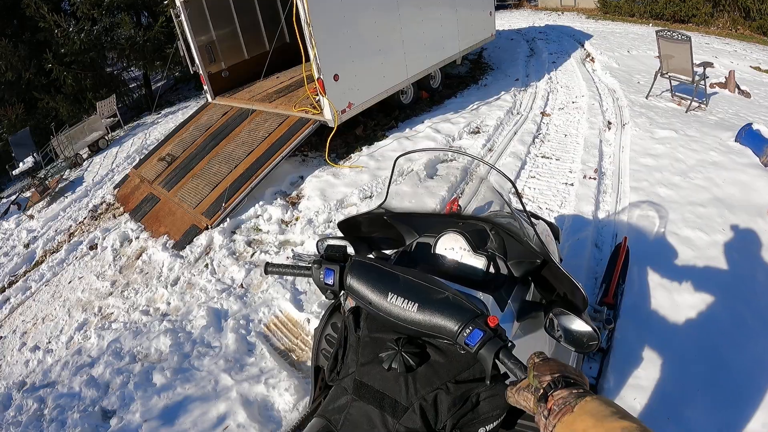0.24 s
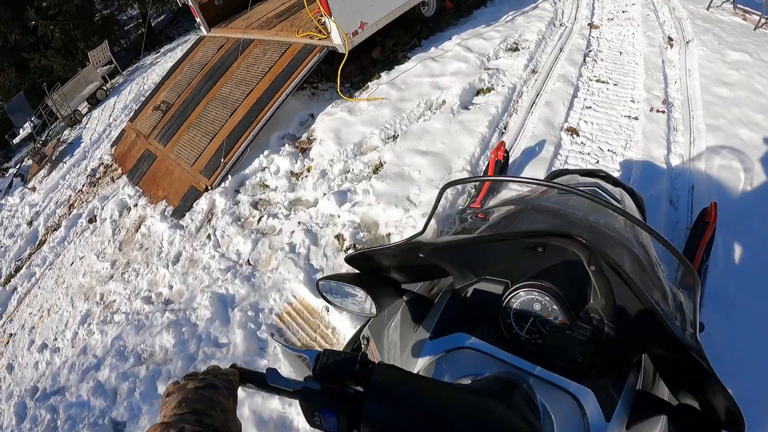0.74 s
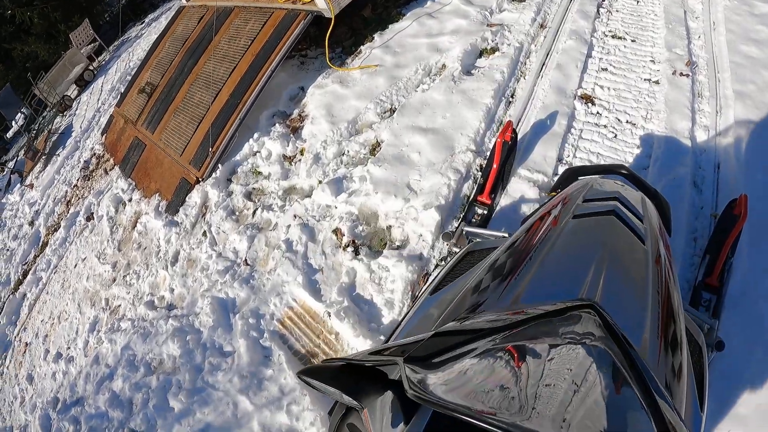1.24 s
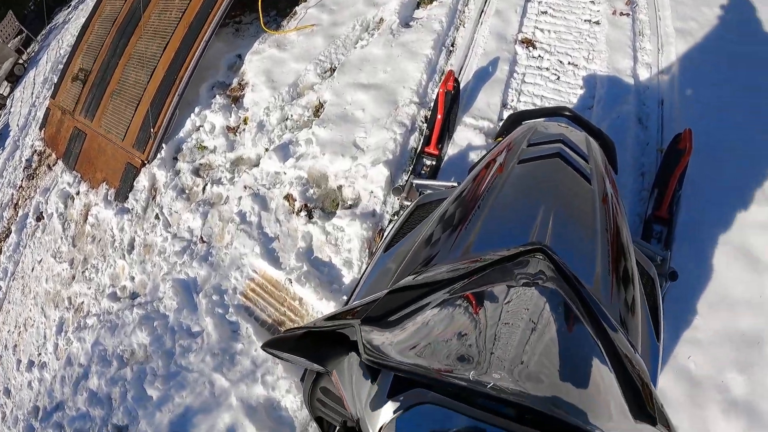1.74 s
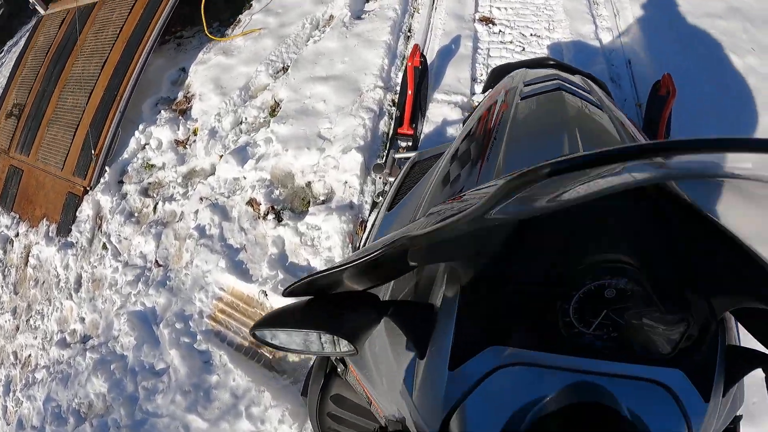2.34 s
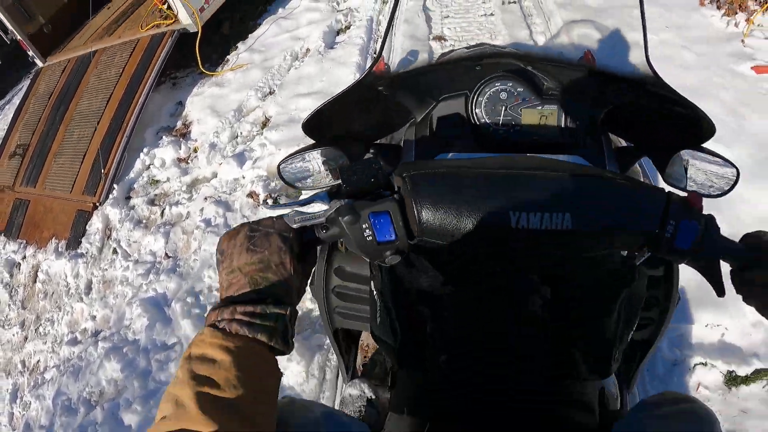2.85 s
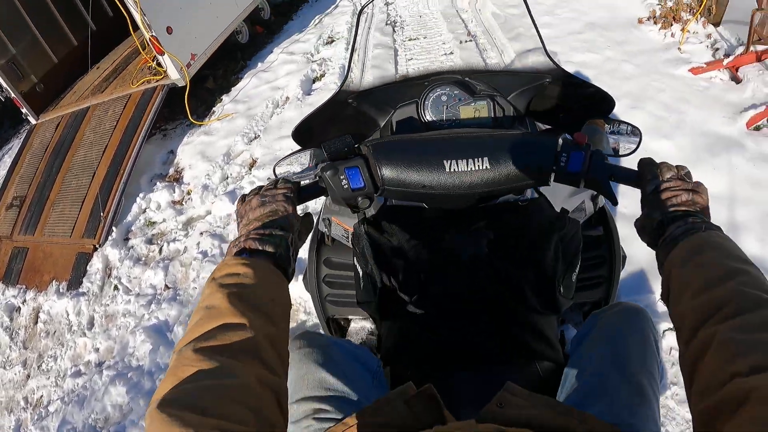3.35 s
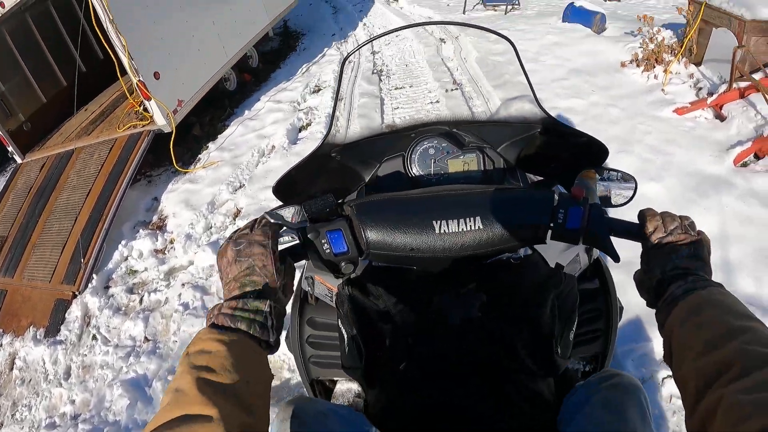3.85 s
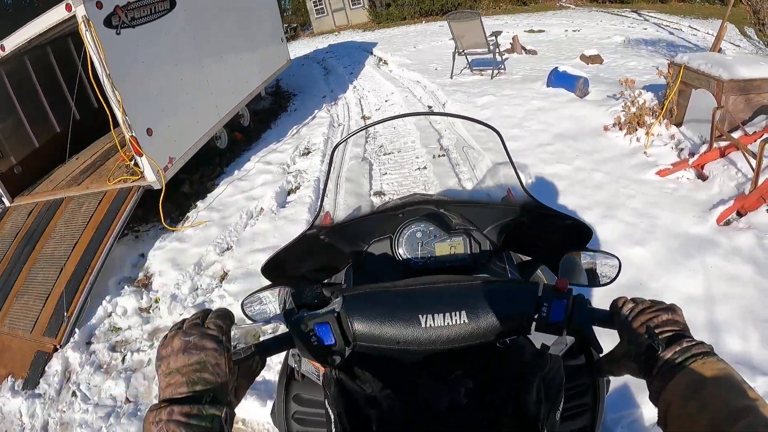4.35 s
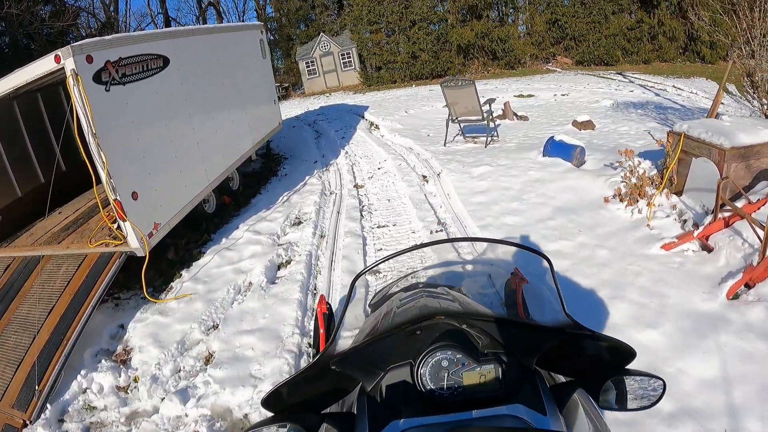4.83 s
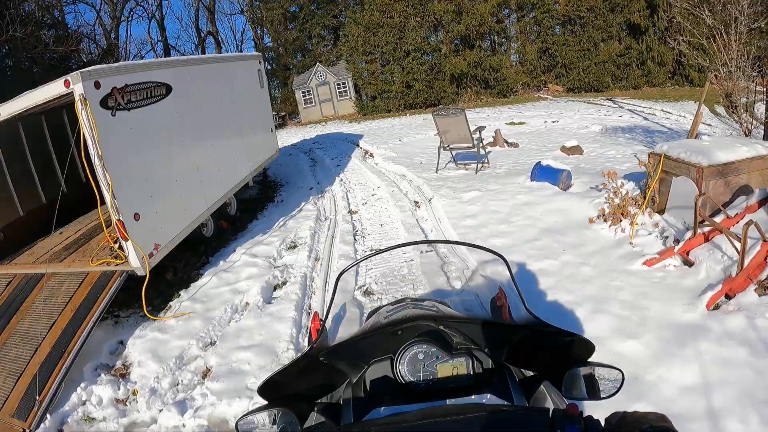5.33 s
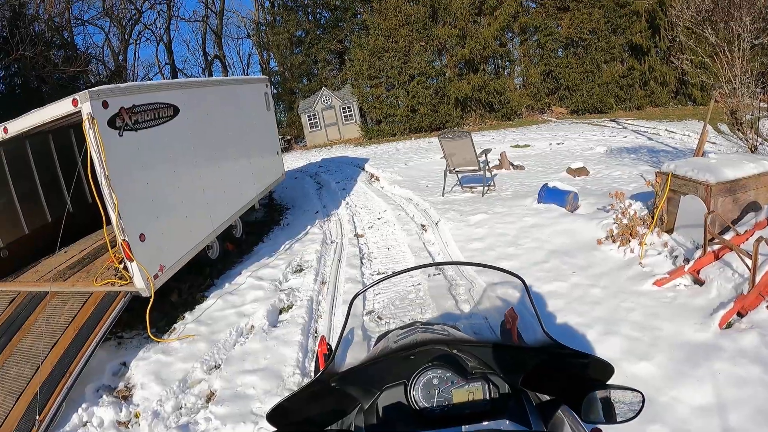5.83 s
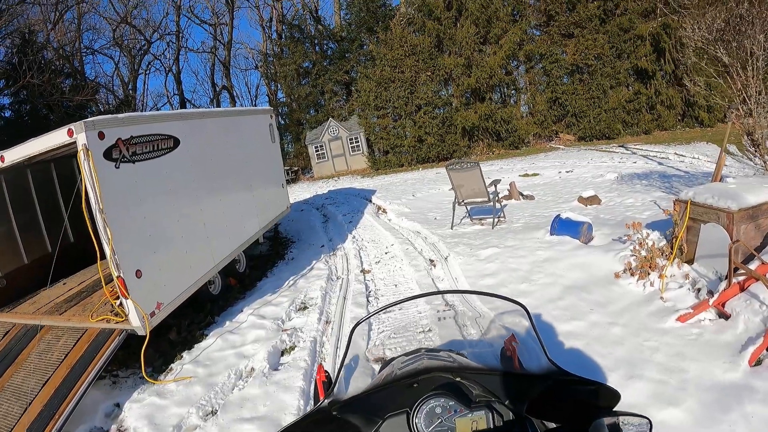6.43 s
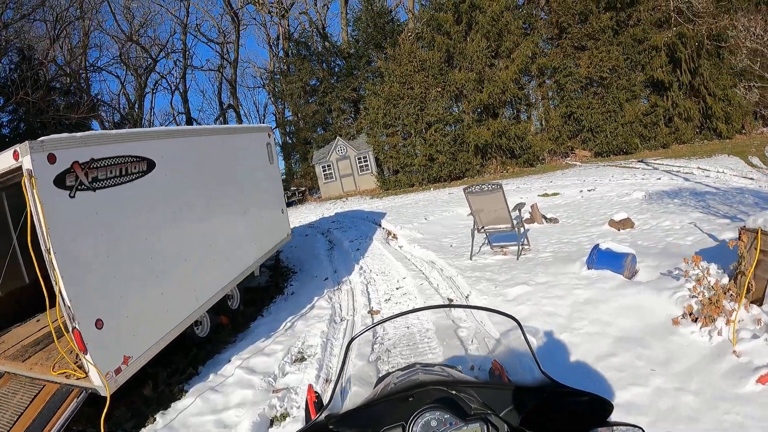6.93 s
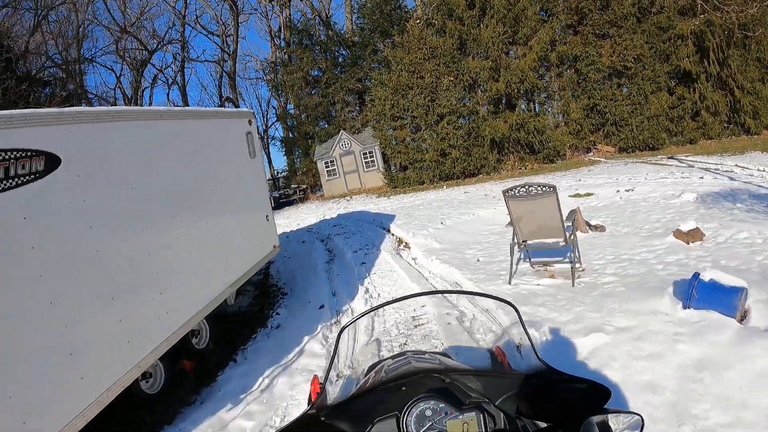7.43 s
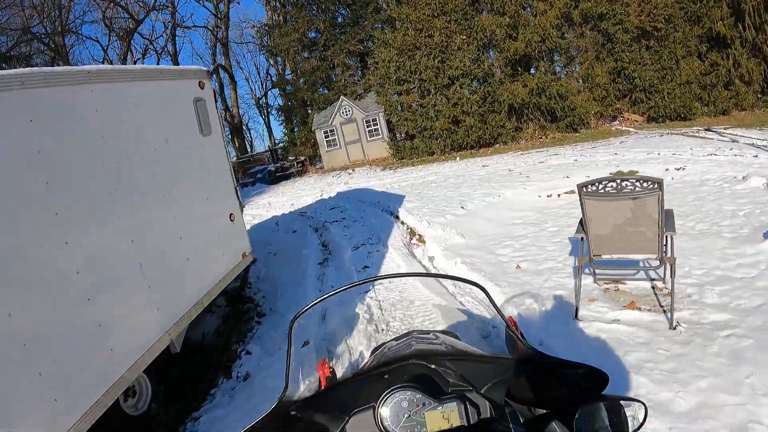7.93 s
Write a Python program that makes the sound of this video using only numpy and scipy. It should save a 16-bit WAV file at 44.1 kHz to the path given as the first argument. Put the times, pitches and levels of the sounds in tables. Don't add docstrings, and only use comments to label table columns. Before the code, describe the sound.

Close rider's-ear view of a snowmobile engine chugging unevenly at idle, brighter when leaned over, then surging into a deep rattling roar.

```python
import sys
import numpy as np
from scipy import signal
from scipy.fft import rfft, irfft
from scipy.io import wavfile
from scipy.ndimage import uniform_filter1d

SR = 44100
rng = np.random.default_rng(int(sys.argv[2]) if len(sys.argv) > 2 else 0)


def master_out(mix):
    frames = np.transpose(np.atleast_2d(mix))
    ceiling = np.clip(frames, -1, 1)
    pcm = np.round(ceiling * 32767).astype(np.int16)
    wavfile.write(sys.argv[1], SR, pcm)


def rack_gain(trim_db):
    fader = np.asarray(trim_db, float)
    return 10 ** (fader / 20)


N = 360738
T = np.arange(N) / SR

# time in seconds, cycle rate in Hz.
SPEED = [(0.0, 17.66), (0.26, 18.43), (1.4, 17.62), (2.02, 18.5), (3.77, 17.81), (4.02, 18.37),
         (4.32, 17.63), (4.93, 18.21), (5.44, 17.8), (5.8, 19.69), (6.09, 33.39), (6.32, 32.01),
         (6.73, 34.17), (7.03, 33.94), (7.48, 31.21), (7.77, 25.56), (8.01, 30.69), (8.18, 31.8)]
# time in seconds, throttle opening from 0 to 1.
THROTTLE = [(0, 0.07), (5.7, 0.11), (5.84, 0.68), (6.03, 0.99), (7.15, 0.98), (7.38, 0.84), (7.7, 0.41),
            (7.84, 0.86), (8.18, 0.9)]
# time in seconds, leaning over the hood 0-1, looking into the footwell 0-1.
RIDER = [(0, 0.1, 1), (.45, 0.05, 0.9), (.75, 0.29, 0), (1.25, 0.96, 0.22), (1.75, 1, 0.8),
         (2.5, 0.93, 0.92), (2.9, 0.44, 0.75), (3.25, 0.22, 0.6), (3.8, 0.3, 0.55), (4.16, 0.27, 0.82),
         (4.5, 0.39, 0.48), (4.85, 0.27, 0.4), (5.75, 0.35, 0.16), (6.4, 0.29, 0.65), (6.9, 0.21, 0.75),
         (7.4, 0.39, 0.24), (7.7, 0.37, 0.2), (8.18, 0.64, 0)]
# multiple of the cycle rate, level in dB.
IDLE_HARMONICS = [(1, -19), (2, 2.5), (3, -6.5), (4, 6.5), (5, -5.5), (6, -8.5), (7, -13.5), (8, -10),
                  (9, -11), (10, -25.5), (11, -28), (12, -11.5), (13, -27), (14, -16), (15, -15), (16, -23),
                  (17, -23), (18, -19.5), (19, -24.5), (20, -24.5), (21, -18.5), (22, -25.5), (23, -45),
                  (24, -45)]
# multiple of the cycle rate, level in dB.
PULLING_HARMONICS = [(1, -3.5), (2, 2), (3, -6.5), (4, -23.5), (5, -14), (6, -7.5), (7, -39), (8, -11.5),
                     (9, -5.5), (10, -24), (11, -20.5), (12, -23), (13, -19), (14, -25), (15, -23),
                     (16, -22), (17, -13.5), (18, -13), (19, -18), (20, -29), (21, -33), (22, -30),
                     (23, -41.5), (24, -39)]
# pitch in Hz, width in Hz, level in dB.
INTAKE = [(282, 75, 19.5), (594, 99, 12), (380, 37, -3.5)]
# time in seconds, how far it stands out in dB.
UNEVEN = [(0, 10), (1.3, 15.5), (2.0, 7.5), (3.0, 9.5), (3.5, 9.5), (4.6, 11.5), (5.7, 3), (6.4, -1),
          (6.7, 8.5), (7.3, 2.5), (7.72, 17.5), (7.86, 7), (8.18, 3)]
# time in seconds, level in dB.
RAGGED = [(0, -4), (5.75, -4), (5.9, -2), (6.08, -6.5), (6.45, -6.5), (6.72, -4), (6.82, 4), (6.95, 3),
          (7.05, 0), (7.3, 3), (7.7, 2), (7.85, 5), (8.18, 2)]
# time in seconds, level in dB, pitch of the ringing pipe in Hz, change of bark in dB
STUMBLES = [(0.138, -35, 90, 0), (0.909, -17.5, 89, -4), (1.354, -22, 89.5, -1), (1.646, -46, 80.5, 0),
            (2.27, -38, 85, -4), (2.695, -25, 85, 0), (3.278, -44, 80.5, 0), (3.34, -29, 79, -6.5),
            (3.667, -23, 85, 0), (4.064, -10.5, 78, 14), (4.621, -25, 92, -5.5), (4.847, -13, 80, -7),
            (5.347, -35, 84, -2), (6.881, -11, 97.4, -6), (6.931, -21, 92, 5), (7.314, -30, 80, 0),
            (7.829, -21, 144, -8), (7.88, -18, 157, -27), (7.956, -13.5, 87, -10.5)]
# share of the cycle, dB in the block, dB at the top, decay in seconds.
KNOCKS = [(.21, -4.5, -9, 0.019), (0.41, -7.5, -4, 0.007), (0.54, -10, -13, 0.014),
          (0.73, -12, -6.5, 0.008)]
# time in seconds, dB relative to the usual first blow of a
EXTRA_KNOCKS = [(0.78, -6.5), (1.3404, -4), (1.507, -6.5), (1.619, -4.5), (1.678, -8), (1.732, -2),
                (2.274, -1), (2.495, -1.5), (2.549, -7), (2.605, -2), (3.213, -1), (3.375, -12),
                (3.5455, -2), (5.3847, -5), (5.7056, -4), (3.716, 0.5), (4.716, -2), (4.936, 0.5),
                (4.994, -1), (5.877, 0), (0.4, -16), (0.8355, -13.5), (0.9477, -4.5), (1.058, -10),
                (1.2261, -4), (1.285, -4.5), (1.9505, -14), (2.0588, -14.5), (2.171, -3.5), (2.2207, -6.5),
                (2.3306, -4.5), (2.386, -5), (2.715, -8), (2.8206, -8), (3.3203, -7), (3.773, -3.5),
                (3.8254, -14.5), (4.214, -12), (4.3854, -10), (4.7698, -5.5), (5.1058, -10.5), (7.51, -6),
                (7.8, -4.5), (7.832, -11.5), (7.87, 3)]
# frequency in Hz, level in dB.
IDLE_BODY = [(120, -6.5), (200, 11), (222, 0), (242, -10), (263, 7), (296, -4), (329, -4), (350, -2.5),
             (385, -9), (633, -14), (1030, -22.5), (1880, -18.5), (2500, -29.5), (3250, -47), (5500, -120)]
# frequency in Hz, level in dB.
PULLING_BODY = [(71, -30.5), (120, 0.5), (130, 6), (161, 3.5), (199, 0.5), (232, 2), (251, -3.5),
                (296, 2.5), (391, -16.5), (587, -14.5), (767, -19.5), (1000, -19.5), (1310, -42),
                (1500, -23.5), (2500, -34), (3250, -52), (5500, -120)]
# pitch in Hz, level in dB, time to fall 60 dB in seconds.
BLOCK = [(1010, 7, 0.03), (1183, 11, 0.021), (1413, 11, 0.015), (1537, 2.5, 0.032), (1695, -1.5, 0.041),
         (1955, -9, 0.041), (2800, -8, 0.029), (3140, -10.5, 0.024)]
# frequency in Hz, level in dB.
HOOD = [(1900, 4), (2400, -8), (2800, -0.5), (3400, -8), (3900, -10.5), (5200, -7.5), (5800, -15.5),
        (6200, -11.5), (7900, -15), (8400, -23), (9300, -28.5), (11700, -26), (13400, -43.5), (15600, -61)]
# time in seconds, level in dB.
SCREEN = [(0, -4), (.8, -19.5), (2.2, -3.5), (3, 2.5), (6.8, 0), (7.8, 6.5)]
# time of the peak in seconds, level in dB, fade in seconds.
WHISTLES = [(5.79, -65, .05), (5.875, -53, .05), (5.945, -58, .04), (5.99, -63.5, .7), (6.1, -62, .03),
            (7.92, -64, .06), (8.15, -62, .1)]
# time in seconds, level in dB.
TICKS = [(4.0125, -32), (4.0166, -16), (4.0179, -3), (4.0192, -21), (4.022, -29), (4.034, -46)]
# pitch in Hz, level in dB, time to fall 60 dB in seconds.
CASE = [(3670, 2, 0.0027), (4720, 13.5, 0.00071), (5330, 5.5, 0.00066), (6050, -9, 0.0012),
        (7600, -8.5, 0.0019), (8700, -11.5, 0.0021), (13000, -21, 0.0032)]
# time in seconds, half length in seconds, level in dB.
RUBS = [
    (4.47, 0.068, -42),
    (2.8, .04, -58),
]
# frequency in Hz, side level over the middle in dB.
WIDTH = [(60, -38), (140, -61), (300, -16.5), (600, -14), (1100, -12), (2000, -5), (5000, -6.5),
         (8000, -5.5), (10500, -10), (12400, -1)]

# dB at rest, dB gained leaning over, dB gained at full throttle
BOOM, BARK = (-16.5, -1.4, 0.93), (-29.5, 3.6, 9.04)
BLOCK_NOISE, HOOD_NOISE, COWL = (-38, 8, 6.8), (-66.5, 12.55, 8.6), (-6, 17.9, .3)


def exhaust(cycle, hz, load, throttle, bark_db, third_db, rough, cowl_db, well_db, lean):
    boom, bark = np.zeros(N), np.zeros(N)
    for (k, idle_db), (_, pulling_db) in zip(IDLE_HARMONICS, PULLING_HARMONICS):
        pitch = k * hz
        late = harmonic_delay(k, pitch, load, lean)
        unsteady = rough * (1.1 + .05 * k + (k < 6) * 2.0 * (1 - load))
        wobble = unsteady * (per_cycle(cycle) + 1j * per_cycle(cycle))
        open_db = pulling_db + intake_db(pitch) - intake_db(k * 32.7)
        opening = throttle if k > 5 else load
        db = idle_db + opening * (open_db - idle_db) + (k == 3) * third_db
        db += cowl_db * hump(pitch, 176.3, 22) + well_db * hump(pitch, 417, 50)
        tone = rack_gain(db) * ((1 + wobble) * np.exp(1j * (2 * np.pi * k * cycle + late))).real
        low = np.clip((150 - pitch) / 40, 0, 1)
        boom += low * tone
        bark += (1 - low) * tone
    return even_out(boom, boom, SR // 4) + rack_gain(bark_db - 1.5) * even_out(bark, bark, SR // 4)


def harmonic_delay(k, pitch, load, lean):
    late = silencer_lag(pitch) + (k > 3) * 1.4 * load + (k == 5) * np.pi * (1 - load)
    late += (k > 12) * load * (2.4 - np.arctan((pitch - 590) / 50) + (pitch - 590) / 110)
    late += load * min(.16 * k, 2.4) + (k == 1) * np.pi * (1 - load)
    over = np.clip((lean - .45) / .4, 0, 1)
    if k < 11:
        turn = 3.2 - 4.1 * over
    elif k == 11:
        turn = 1.4 - 2.3 * over
    elif k < 14:
        turn = 1.4 + 2.1 * over
    else:
        turn = 3.6
    return late + (1 - load) * ((k > 7) * turn + (k == 18) * 1.8 - (k > 18) * 1.2)


def silencer_lag(hz):
    return np.maximum(270 / hz - 4.2, -1.4)


def intake_db(hz):
    return sum(db * hump(hz, centre, width) for centre, width, db in INTAKE)


def stumbles():
    out, drop_db = np.zeros(N), np.zeros(N)
    for s, db, hz, bark_db in STUMBLES:
        t = np.maximum(T - s, 0)
        swell = (t / .016) * np.exp(1 - t / .016)
        out += rack_gain(db - 1.0) * np.sin(2 * np.pi * hz * t) * swell
        drop_db += np.minimum(bark_db, 0) * swell
    return out, drop_db


def clatter(cycle, load, lean, body_db, hood_db, ragged_db):
    swing_db = 2 - 6.5 * load
    puff_db = swing_db * np.cos(2 * np.pi * (cycle - .7 - .3 * load))
    puff = stereo_noise((0.5 + 0.12 * load) * rack_gain(ragged_db + puff_db))
    cycle = cycle - .5 * load
    body = block_body(cycle, load, puff)
    hood = hood_ticks(cycle, load)
    body = shelf(body, 1270, -6.5 * lean, "low")
    hood = shelf(hood, 6600, -9 * lean + follow(SCREEN), "high")
    return rack_gain(body_db) * body + rack_gain(hood_db + 18.5) * hood


def block_body(cycle, load, puff):
    blows = .12 + .55 * load + knocks(cycle, scatter_db=2.2, sharp=1.15)
    shake = stereo_noise(blows, cycle - KNOCKS[0][0] + .03)
    shake = shelf(shake, 967, -40.5, "low") + shelf(puff, 967, -32.5, "high")
    idle = unit(colour(shake, IDLE_BODY))
    pulling = unit(colour(shake, PULLING_BODY))
    body = (1 - load) * idle + load * pulling
    block = unit(sum(rack_gain(db) * ring(shake, hz, t60) for hz, db, t60 in BLOCK))
    body += rack_gain(-11 - 8 * load) * block
    band = signal.sosfilt(signal.butter(4, [800, 2300], "band", fs=SR, output="sos"), body[0])
    body = even_out(body, band, SR // 3)
    return colour(body, [(100, -7), (200, -15), (300, -9), (450, 1), (600, -4), (750, -6.5), (950, -1.5)])


def hood_ticks(cycle, load):
    tick = stereo_noise(0.22 + 0.65 * load + knocks(cycle, scatter_db=5.5, sharp=4.8))
    top = stereo_noise(0.17 + 0.37 * load + knocks(cycle, scatter_db=6.0, sharp=4.5, top=True))
    tick = colour(tick, [(4000, 0), (4800, -3), (6000, -24)])
    top = colour(top, [(3800, -24), (4800, -3), (5700, 0)])
    hood = colour(tick + top, HOOD)
    return even_out(hood, hood[0], SR // 3)


def knocks(cycle, scatter_db, sharp, top=False):
    env = np.zeros(N)
    for order, (share, block_db, top_db, decay) in enumerate(KNOCKS):
        db = top_db if top else block_db
        at = np.flatnonzero(np.diff(np.floor(cycle - share)))
        hit = np.zeros(N)
        hit[at] = rack_gain(db + scatter_db * rng.standard_normal(N // 1000)[:len(at)])
        if order == 0:
            for s, extra_db in EXTRA_KNOCKS:
                hit[int(s * SR)] += rack_gain(db + extra_db)
        env += signal.lfilter([1], [1, -np.exp(-sharp / (decay * SR))], hit)
    rise = np.exp(-1 / (0.002 * SR))
    return signal.lfilter([1 - rise], [1, -rise], env)


def whistle(cycle):
    hz = 6335 - 330 * np.exp(-np.maximum(T - THROTTLE[1][0], 0) / .14)
    flutter = 1 + .4 * unit(uniform_filter1d(rng.standard_normal(N), size=300))
    flutter *= 1 + 0.7 * np.cos(2 * np.pi * cycle)
    env = np.zeros(N)
    for s, db, fade in WHISTLES:
        env += rack_gain(db) * np.exp(np.minimum((T - s) / 0.015, (s - T) / fade))
    squeak_env = rack_gain(-60) * np.exp(np.minimum((T - 5.87) / .01, (5.87 - T) / .07))
    squeak = squeak_env * np.sin(2 * np.pi * 5790 * T)
    return np.sqrt(2) * flutter * (env * np.sin(2 * np.pi * np.cumsum(hz) / SR) + squeak)


def finger():
    hit = np.zeros(N)
    for s, db in TICKS:
        hit[int(s * SR)] = rack_gain(db)
    rasp = signal.lfilter([1], [1, -np.exp(-1 / (.0022 * SR))], hit) * rng.standard_normal(N)
    tick = np.zeros(N)
    for k, (hz, db, t60) in enumerate(CASE):
        sign = -(-1) ** k
        tick += sign * rack_gain(db + 1.5) * ring(hit + 0.065 * rasp, hz, t60)
    tick = colour(tick, [(1500, -2), (2500, -1), (3600, -2), (4700, -1.5), (8500, 0), (11000, -8.5),
                         (13500, -12), (14600, -40)])
    push = np.roll(hit, -90) * (np.abs(T - TICKS[0][0]) < .003)
    for hz, db, t60 in [(500, -9, .012), (1200, -13, .01), (2100, -18, .005)]:
        tick += rack_gain(db) * ring(push + .1 * rasp, hz, t60)
    cloth = unit(colour(rng.standard_normal(N), [(1200, -33), (1800, 9), (3900, 1.5), (4700, -29),
                                                 (7400, -13), (9000, -38)]))
    return tick + cloth * sum(rack_gain(db) * np.exp(-((T - s) / half) ** 2) for s, half, db in RUBS)


def stereo_noise(env, cycle=None):
    mid, other, pattern = rng.standard_normal((3, N))
    if cycle is not None:
        i = np.arange(N)
        new_cycle = np.diff(np.floor(cycle), prepend=0) > 0
        since = i - np.maximum.accumulate(i * new_cycle)
        repeat = .55
        mid = np.sqrt(1 - repeat ** 2) * mid + repeat * pattern[since]
    mid, other = mid * env, other * env
    late = irfft(-1j * rfft(mid), N)
    side = colour(0.56 * late + 0.42 * other, WIDTH)
    return np.array([mid + side, mid - side])


def per_cycle(cycle):
    count = int(cycle[-1]) + 2
    return np.interp(cycle, np.arange(count), rng.standard_normal(count))


def ring(x, hz, t60):
    p = np.exp(2j * np.pi * hz / SR - np.log(1000) / (t60 * SR))
    return signal.lfilter([1], [1, -p], x).imag


def colour(x, table):
    hz, db = np.transpose(table)
    x = np.concatenate([x, x[..., :-8193:-1], x[..., 8191::-1]], axis=-1)
    size = x.shape[-1]
    f = np.maximum(np.fft.rfftfreq(size, 1 / SR), 1)
    return irfft(rfft(x) * rack_gain(np.interp(np.log(f), np.log(hz), db)), size)[..., :N]


def shelf(x, hz, db, kind):
    part = signal.sosfiltfilt(signal.butter(3, hz, kind, fs=SR, output="sos"), x)
    return x + (rack_gain(db) - 1) * part


def hump(hz, centre_hz, width_hz):
    return 1 / (1 + ((hz - centre_hz) / width_hz) ** 2)


def even_out(x, guide, window):
    return x / np.sqrt(uniform_filter1d(guide ** 2, window))


def unit(x):
    return x / np.sqrt(np.mean(x ** 2))


def follow(table):
    return np.interp(T, *np.transpose(table))


def scene():
    s, lean, look = np.transpose(RIDER)
    lean, look = np.interp(T, s, lean), np.interp(T, s, look)
    hz = follow(SPEED)
    load = np.clip((hz - 19) / 13, 0, 1)
    throttle = np.clip(follow(THROTTLE), 0, 1)

    def level_db(layer):
        return layer[0] + layer[1] * lean + layer[2] * throttle

    ragged_db = follow(RAGGED)
    rough = np.clip(.065 + (.005 + 0.3 * (1 - throttle)) * load, 0, 1) * rack_gain(ragged_db)
    cycle = np.cumsum(hz) / SR + (4.4 - silencer_lag(2 * hz)) / (4 * np.pi)
    cycle = cycle + .004 * load * rack_gain(2 * ragged_db) * per_cycle(cycle)

    duck_db = -12.0 * np.exp(-np.maximum(T - 4.022, 0) / 0.086) * (T > 4.022)
    misses, drop_db = stumbles()
    boom_db = level_db(BOOM) - 1.5 * hump(hz, 27.8, 1.9)
    bark_db = level_db(BARK) - boom_db + drop_db + duck_db / 2
    pipe = exhaust(cycle, hz, load, throttle, bark_db, follow(UNEVEN), rough,
                   level_db(COWL), -11 + 22 * look, lean)
    pipe = rack_gain(boom_db) * pipe + misses
    side = .45 * colour(pipe, WIDTH)
    pipe = np.array([pipe + side, pipe - side])

    rolling = np.maximum(0.71 * (T > SPEED[10][0]) - throttle, 0)
    hood_db = level_db(HOOD_NOISE) + HOOD_NOISE[2] * rolling + duck_db / 4
    parts = clatter(cycle, throttle, lean, level_db(BLOCK_NOISE) + duck_db, hood_db, ragged_db)
    return pipe + parts + whistle(cycle) + finger()


def band_limit(x):
    return signal.sosfilt(signal.butter(12, 15700, fs=SR, output="sos"), x)


def record(dry):
    dry = np.array([colour(dry[0], [(10000, .3), (12500, -7)]), dry[1]])
    x = np.tanh(0.88 * dry) / 0.76 * np.minimum(T / .004, 1)
    x = colour(x, [(11500, 0), (13000, -2), (14700, -3), (15300, -25)])
    return band_limit(x)


dry = scene()
out = record(dry)
master_out(out)
```